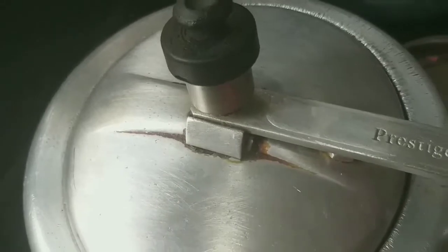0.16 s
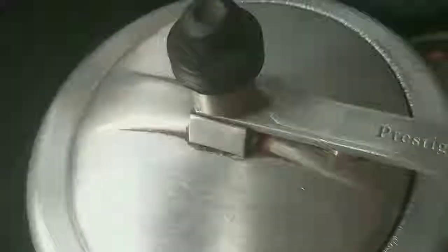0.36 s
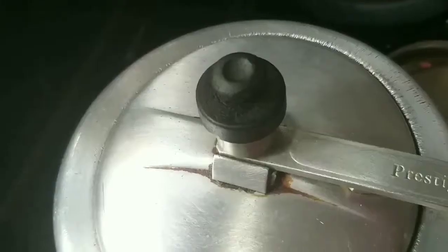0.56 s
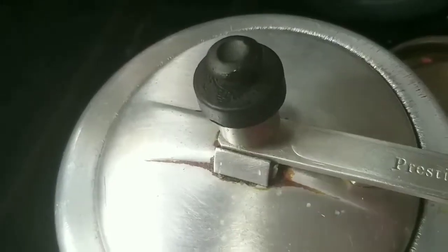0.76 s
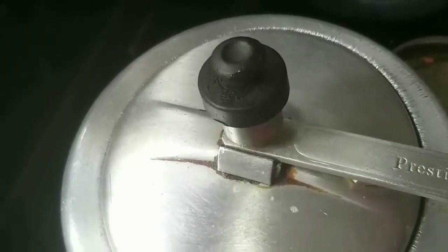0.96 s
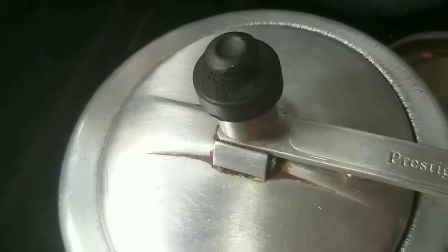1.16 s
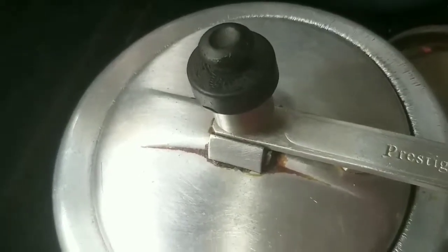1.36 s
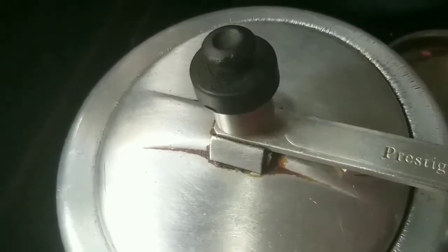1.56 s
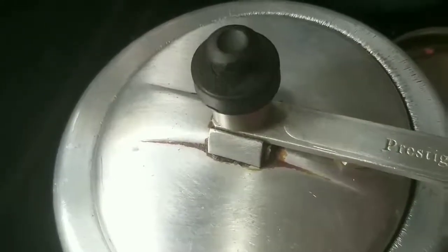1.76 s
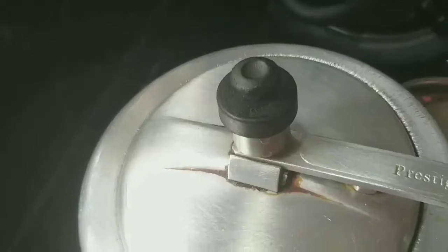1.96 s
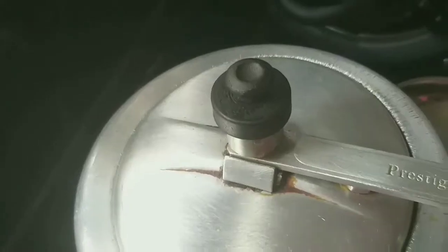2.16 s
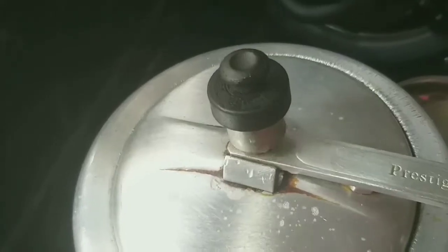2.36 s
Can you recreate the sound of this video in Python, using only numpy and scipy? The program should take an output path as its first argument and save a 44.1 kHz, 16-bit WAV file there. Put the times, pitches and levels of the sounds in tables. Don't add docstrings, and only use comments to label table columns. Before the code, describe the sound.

Pressure cooker steam roars, broadband and harsh, until 0.3 s, then drops almost instantly to near silence. From about 0.44 s a thin, bright hiss sputters in small puffs with faint metal knocks. The full blast pops open at 0.67 s and holds, churning, until 1.78 s. Another abrupt cut, then from 1.88 s breathy, whistling spits and soft metallic ticks; the roar returns at 2.35 s to the end. Close phone pickup.

```python
import sys
import numpy as np
from scipy import signal
from scipy.fft import rfft, irfft
from scipy.io import wavfile
from scipy.ndimage import uniform_filter1d

SR = 44100
rng = np.random.default_rng(int(sys.argv[2]) if len(sys.argv) > 2 else 0)


def persist_wave(psi):
    counts = np.round(np.clip(psi, -1, 1) * 32767).astype(np.int16)
    wavfile.write(sys.argv[1], SR, np.atleast_2d(counts).T)


def undo_db(level):
    steps = np.asarray(level, float) / 20
    return 10 ** steps


N = 105663
HZ = np.arange(N // 2 + 1) * SR / N + 1


def read(table, hz):
    table_hz, value = np.array(table).T
    return np.interp(np.log(hz), np.log(table_hz), value)


def walk(rate_hz):
    hold = max(int(SR / rate_hz), 2)
    held = np.repeat(rng.standard_normal(5000), hold)[:N]
    slewed = uniform_filter1d(uniform_filter1d(held, hold), hold // 2)
    level = slewed - uniform_filter1d(held, 5 * hold)
    return level / level.std()


def turbulence(colour, side, flicker_db, rate_hz, shared_db):
    mid, wide = rfft(rng.standard_normal((2, N)))
    wide = wide * undo_db(read(side, HZ))
    pair = np.array([mid + wide, mid - wide]) * undo_db(read(colour, HZ))
    out, last = 0, walk(rate_hz)
    for centre_hz in 25 * 2 ** np.arange(0, 9.1, 1 / 3):
        now = walk(rate_hz)
        mask = np.clip(1 - 3 * np.abs(np.log2(HZ / centre_hz)), 0, 1)
        out = out + irfft(pair * mask, N) * undo_db(flicker_db * now + shared_db * last)
        last = (last + now) / np.sqrt(2)
    return out / out.std()


# freq_hz, density_db_per_hz
KITCHEN_COLOUR = [(60, -4.5), (400, -16.5), (1500, -12), (4000, -2.5), (8000, -19.5), (10300, -5),
                  (11500, -38.5)]


def kitchen(t):
    floor_db, echo_db, echo_fall_db_per_s = -68, -13, 618
    echo = sum(undo_db(level_db + echo_db - echo_fall_db_per_s * np.abs(t - end_s))
               for start_s, end_s, level_db in LIFTS)
    return (undo_db(floor_db) + echo) * turbulence(KITCHEN_COLOUR, ROAR_SIDE, 1.1, 16, 1.1)


# time_s, pitch_hz, level_db, length_s
RINGS = [(0.443, 110, -64.5, 0.034), (0.48, 960, -59, 0.029), (.56, 1150, -59, .04),
         (0.592, 562, -56, .075), (1.888, 2120, -50, 0.02), (1.889, 1713, -54.5, 0.016),
         (1.94, 2510, -50, 0.038), (2.0, 1810, -54, 0.046), (2.055, 2510, -50, 0.038),
         (2.191, 1940, -53, 0.05), (2.104, 1162, -51.5, 0.029), (2.219, 1660, -55, 0.046),
         (2.31, 624, -47, 0.029)]


def rings(t):
    out = 0
    for time_s, pitch_hz, level_db, length_s in RINGS:
        swell = np.exp(-(2 * (t - time_s) / length_s) ** 2)
        out = out + undo_db(level_db) * swell * np.sin(2 * np.pi * pitch_hz * t)
    return out


# start_s, end_s, level_db
LIFTS = [
    (-.1, .316, -16),
    (0.673, 1.777, -17.5),
    (2.347, 2.5, -17.5),
]


def lift(t):
    rise_db_per_s, fall_db_per_s = 1095, 1057
    creep_db, creep_db_per_s = -15, 300.5
    surge_db, surge_s = 2, 0.04
    levels = []
    for start_s, end_s, level_db in LIFTS:
        since = t - start_s
        creep = creep_db + creep_db_per_s * np.minimum(since, 0)
        rise = np.maximum(rise_db_per_s * since, creep)
        gate = np.minimum(0, np.minimum(rise, fall_db_per_s * (end_s - t)))
        levels.append(level_db + surge_db * np.exp(-np.abs(since) / surge_s) + gate)
    return np.max(levels, axis=0)


def whistle(opened):
    pitch_hz, sag_hz, width_hz, level_db = 5970, 410, 600, -5
    phase = 2 * np.pi * np.cumsum(pitch_hz - sag_hz * opened) / SR
    breath = walk(2 * width_hz) * np.cos(phase) + walk(2 * width_hz) * np.sin(phase)
    return undo_db(level_db) * breath


# time_s, extra_db, length_s
PUFFS = [(0.547, 7, 0.0072), (0.567, 3.5, 0.0089), (.59, 5, .01), (0.614, 7, .01), (0.645, 3.5, 0.025),
         (1.881, 7, .008), (1.909, 3, 0.0068), (2.012, 1.5, 0.022), (2.081, 6.5, 0.0078), (2.128, 1, .016),
         (2.165, 5, 0.006), (2.213, -1, 0.014), (2.255, 6, .012)]


def sputter(t, opened):
    droplet_hz, droplet_db, swell_hz, swell_db = 230, 2, 40, 0.67
    steadying = 0.36
    spit_db = droplet_db * walk(droplet_hz) + swell_db * walk(swell_hz)
    puff_db = sum(extra_db * np.exp(-(2 * (t - time_s) / length_s) ** 2)
                  for time_s, extra_db, length_s in PUFFS)
    return undo_db(spit_db * (1 - steadying * opened) + puff_db)


# time_s, hiss_level_db, narrow_gap_share
FLOW = [(.313, -21, 0.85), (.36, -42, 0.9), (.378, -67, .95), (.426, -53, .95), (0.442, -33, 1),
        (.54, -28.5, 0.85), (.635, -26, 0.83), (.67, -23, 0.5), (.75, -24.5, 0.08), (1.78, -21.5, 0.08),
        (1.814, -54.5, .5), (1.845, -57, .5), (1.869, -65, .3), (1.884, -27.5, 0.05), (2.09, -24.5, 0.1),
        (2.29, -27.5, 0.01), (2.333, -17.5, 0.2), (2.4, -19, .06)]
# freq_hz, density_db_per_hz
HISS_WIDE = [(1200, -53.5), (2500, -24.5), (4800, -13.5), (5900, -2), (6900, -5), (8100, -3.5),
             (10200, -15), (11800, -27.5)]
# freq_hz, density_db_per_hz
HISS_NARROW = [(500, -40.5), (1400, -20), (4900, -14), (5600, -1), (8600, 1), (10000, -6.5), (10850, -12),
               (11250, -39)]
# freq_hz, side_db
HISS_SIDE = [(1500, 5), (3500, -6.5), (6400, -17.5), (9000, -12.5), (11400, -4.5)]


def hiss(t):
    time_s, level_db, narrow = np.array(FLOW).T
    share = np.clip(np.interp(t, time_s, narrow), 0, 1)
    opened = np.minimum(undo_db(lift(t) - LIFTS[1][2]), 1)
    jet = np.sqrt(share) * turbulence(HISS_NARROW, HISS_SIDE, 2.6, 43, 0.52)
    jet = jet + np.sqrt(1 - share) * turbulence(HISS_WIDE, HISS_SIDE, 1.4, 43, 0.6)
    jet = jet + (1 - share) * whistle(opened)
    return jet * sputter(t, opened) * undo_db(np.interp(t, time_s, level_db))


# freq_hz, density_db_per_hz
ROAR_COLOUR = [(30, -18), (100, -3), (250, 0.5), (1800, 0.5), (4500, 0), (8200, -5.5), (9600, -13),
               (10400, -34.5)]
# freq_hz, side_db
ROAR_SIDE = [(30, -6.5), (100, -8.5), (300, -14.5), (2000, -10), (5000, -9), (10000, -0.5)]


def roar(t):
    churn_hz, churn_db = 76, 0.7
    jet = turbulence(ROAR_COLOUR, ROAR_SIDE, 2.2, 42.91, 0.46)
    return jet * undo_db(lift(t) + churn_db * walk(churn_hz))


def scene():
    t = np.arange(N) / SR
    return kitchen(t) + rings(t) + hiss(t) + roar(t)


def gate_bands(x):
    low_hz, low_db, low_floor_db = 2800, -29, -86
    top_idle_hz, top_busy_hz, idle_db, busy_db = 11800, 10280, -41, -21
    top_keep_db, top_drop_db = -16, -35
    patchy_db, thin_db = 3, 6.5
    hop, lead, bins = 1024, 1824, 8
    win = signal.windows.kaiser_bessel_derived(2 * hop, 4 * np.pi)
    at = np.arange(N // hop + 3)[:, None] * hop + np.arange(2 * hop)
    spec = rfft(np.pad(x, ((0, 0), (lead, 4 * hop)))[:, at] * win)

    power = np.abs(spec[..., :hop].mean(axis=0) / hop) ** 2 + 1e-20
    band_db = 10 * np.log10(power.reshape(len(at), -1, bins).sum(axis=2))
    rel_db = band_db - band_db.max(axis=1, keepdims=True)
    hz = (np.arange(hop // bins) + 0.5) * 4 * SR / hop
    low = hz < low_hz
    bass_db = np.median(rel_db[:, hz < low_hz / 2], axis=1, keepdims=True)
    top_hz = np.interp(bass_db, [idle_db, busy_db], [top_idle_hz, top_busy_hz])

    margin_db = rel_db - low_db + patchy_db * rng.standard_normal(rel_db.shape)
    weak = low & ((margin_db < 0) | (band_db < low_floor_db))
    above_top = (hz > top_hz) & (rel_db < top_keep_db)
    faint_top = (hz > top_busy_hz) & (margin_db + low_db < top_drop_db)
    keep = np.repeat(~(weak | above_top | faint_top), bins, axis=1)
    thin = np.repeat(low & (margin_db < thin_db), bins, axis=1)
    peaks = power > undo_db(np.repeat(band_db, bins, axis=1)) ** 2 / 6
    mask = np.pad(keep & (peaks | ~thin), ((0, 0), (0, 1)))

    frames = irfft(spec * mask) * win
    out = frames[:, 1:, :hop] + frames[:, :-1, hop:]
    return out.reshape(2, -1)[:, lead - hop:lead - hop + N]


def low_pass(x):
    return signal.sosfilt(signal.butter(12, 12040, fs=SR, output="sos"), x)


# freq_hz, left_minus_right_db
LEFT_DB = [(60, .5), (300, 0), (1400, 1), (5000, 0.5), (10000, -1)]


def record(dry):
    tilt = undo_db(np.array([[0.5], [-0.5]]) * read(LEFT_DB, HZ))
    ports = irfft(rfft(dry) * tilt, N)
    mix = gate_bands(np.tanh(0.8 * ports) / 0.8)
    return low_pass(mix)


dry = scene()
out = record(dry)
persist_wave(out)
```